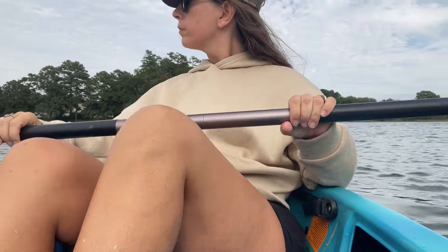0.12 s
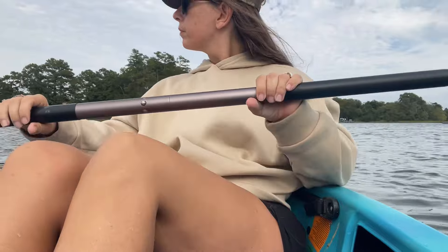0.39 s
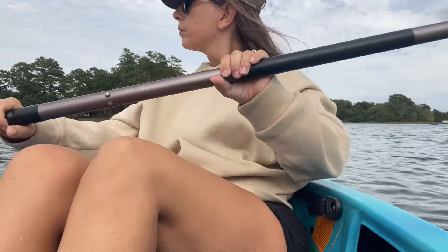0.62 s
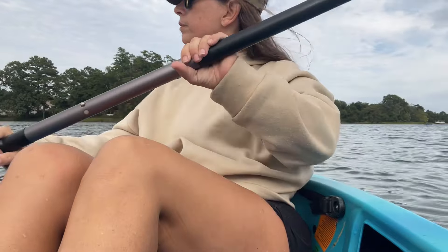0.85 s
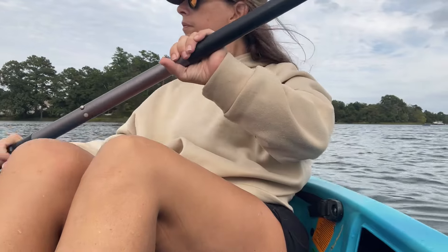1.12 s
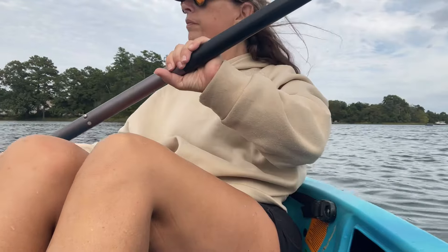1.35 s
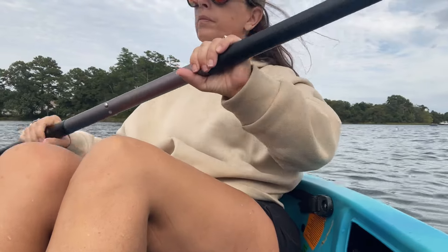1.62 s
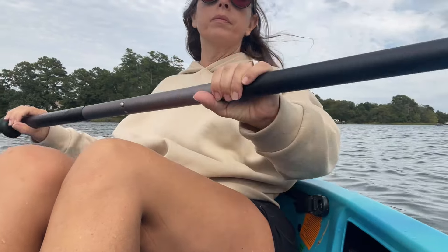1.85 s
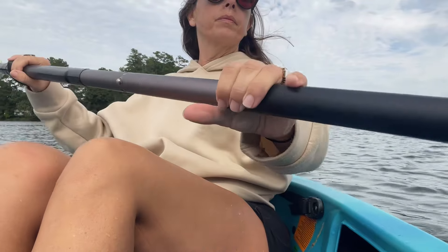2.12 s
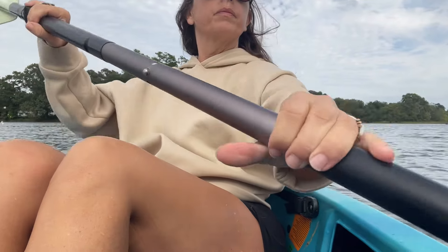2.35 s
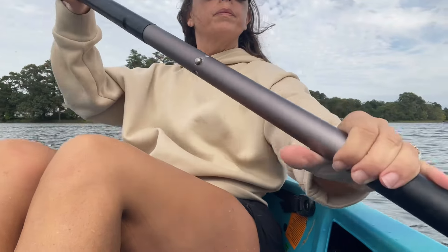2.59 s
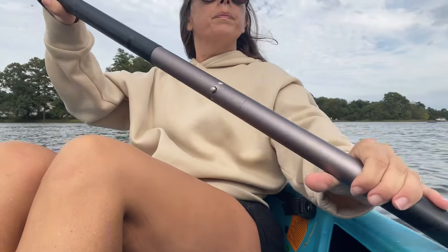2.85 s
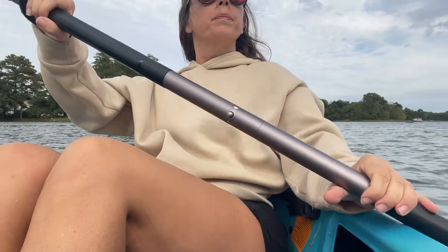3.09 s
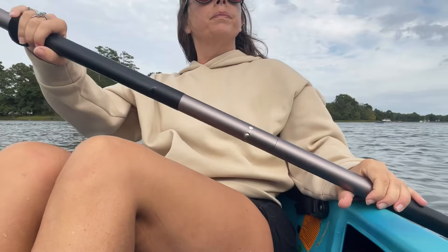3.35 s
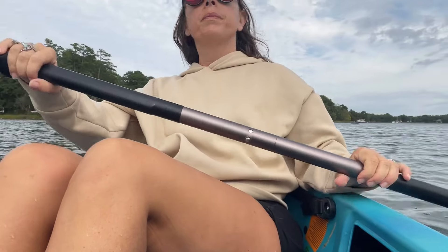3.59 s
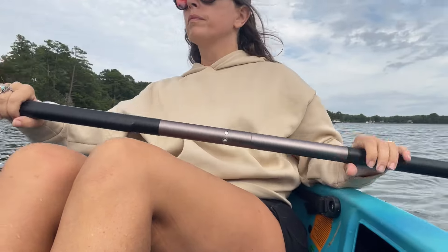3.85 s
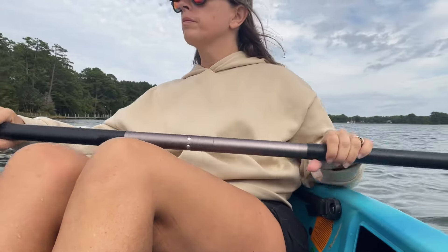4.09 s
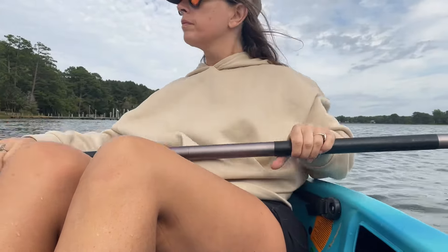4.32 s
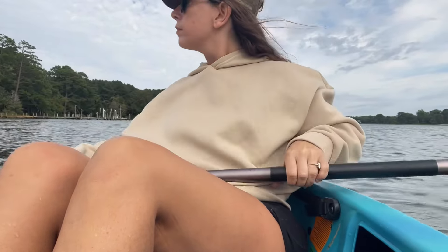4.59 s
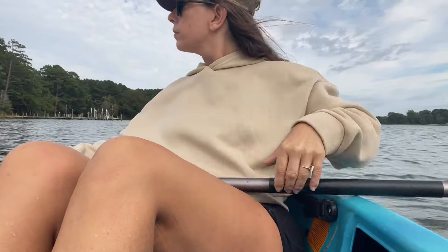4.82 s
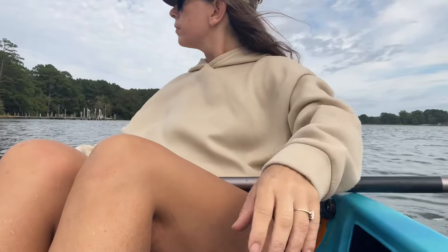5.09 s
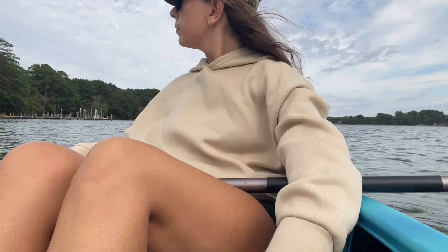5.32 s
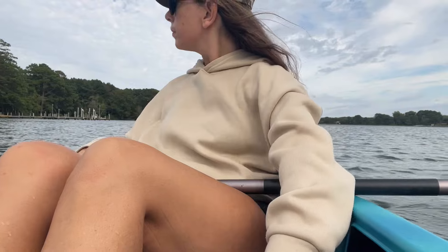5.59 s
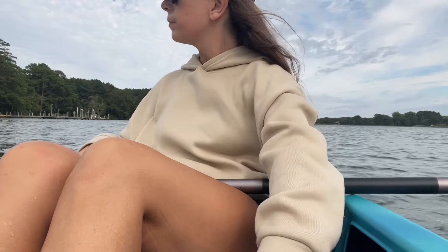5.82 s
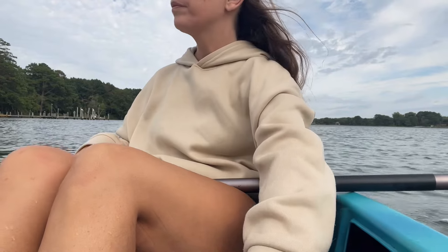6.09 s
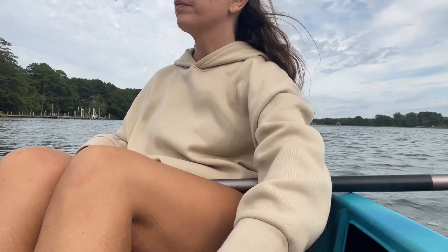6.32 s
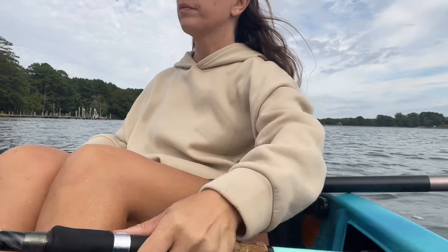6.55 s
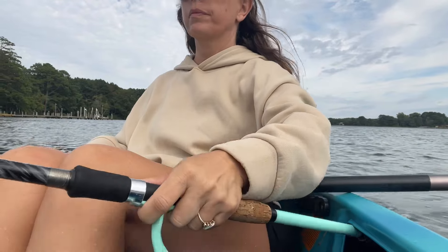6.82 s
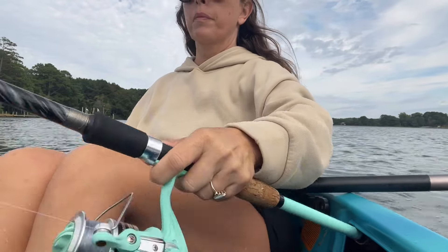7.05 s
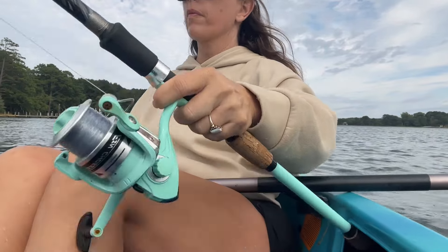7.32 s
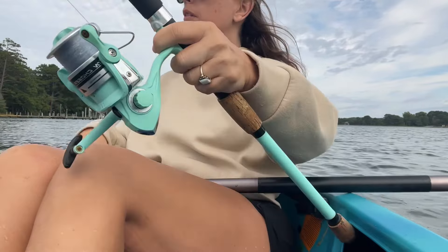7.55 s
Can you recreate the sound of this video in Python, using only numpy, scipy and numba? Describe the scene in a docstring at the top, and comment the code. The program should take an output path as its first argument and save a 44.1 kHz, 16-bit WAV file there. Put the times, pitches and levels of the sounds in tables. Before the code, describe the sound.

Close stereo sound from a phone inside a plastic kayak on open water, over a very soft far hiss. At 0-0.2 s dull bumps and wet, fizzy spray; at 0.5 s a soft low buffet and slap. From 0.7 to 2 s drips, ticks, trickling and small gurgles. At 2.4 s a hollow double knock of the paddle on the hull, then bubbling plops to 3.1 s. From 3 to 5.3 s lively, short, popping slaps come in surges, with knocks at 3.8, 4.4 and 4.8 s. It thins to sparse laps and small cloth or spray rustles around 6.3 s, with a barely audible thin whistle. At 6.65 s the loudest event: a deep hollow thunk with a bright crack, a lighter knock at 6.78 s. Then quiet ripples, a faint scrape and tap at 7.3 s, soft lapping until 7.7 s.

```python
"""Wavelets slap and gurgle on the hull of a plastic kayak: short gliding tones that set the hull modes humming.
Knocks of paddle and rod ring the same modes; ticks are cracks of noise, bubbles brief tones.
Spray and cloth fizz in grainy noise over a far shaped hiss with two whistles; a moving edge thins the bass.
Deep buffets are low noise. A phone in the boat hears it all with two spaced microphones."""
import sys
import numpy as np
from scipy import signal
from scipy.fft import rfft, irfft
from scipy.io import wavfile
from scipy.ndimage import uniform_filter1d
from numba import njit

SR = 44100
rng = np.random.default_rng(int(sys.argv[2]) if len(sys.argv) > 2 else 0)


def waveform_to_disk(signal):
    """Save audio, clipped to [-1, 1], as 16-bit WAV at the path in sys.argv[1]."""
    frames = np.transpose(np.atleast_2d(signal))
    scaled = np.clip(frames, -1, 1) * 32767
    samples = np.round(scaled).astype(np.int16)
    wavfile.write(sys.argv[1], SR, samples)


def undo_db(level):
    """Turn decibels back into plain size, where 20 dB means ten times bigger."""
    steps = np.asarray(level, float) / 20
    return 10 ** steps


N = 338732
T = np.arange(N) / SR


def curves(table):
    """Columns of a table after its time column, one value a sample."""
    s, *columns = np.transpose(table)
    return [np.interp(T, s, column) for column in columns]


def unit(x):
    """Scale to rms 1."""
    return x / np.sqrt(np.mean(x ** 2))


def band(x, lo_hz, hi_hz, order=2):
    """Butterworth band-pass."""
    return signal.sosfilt(signal.butter(order, [lo_hz, hi_hz], "band", fs=SR, output="sos"), x)


def walk(rate_hz):
    """Random levels held 1 / rate_hz and slewed twice."""
    hold = int(SR / rate_hz)
    steps = np.repeat(rng.standard_normal(N // hold + 1), hold)
    return 1.54 * uniform_filter1d(uniform_filter1d(steps, hold), hold)[:N]


def spaced(x, own):
    """One sound at both microphones, 13 samples later at the left, plus a share that each hears alone."""
    return np.array([np.roll(x[0], 13), x[0]]) + own * x[1:]


def swells(start_s, hold_s, level_db):
    """Sum of envelopes that rise, hold and fall; longer ones have softer flanks."""
    t = T[::32]
    start, hold, level = np.array([start_s, hold_s, level_db])[:, :, None]
    rise_s = 0.0091 + 0.21 * hold  # time for 20 dB
    fall_s = 0.031 + 0.067 * hold
    flank = np.minimum(np.minimum((t - start) / rise_s, (start + hold - t) / fall_s), 0)
    return np.interp(T, t, undo_db(level + 20 * flank).sum(axis=0))


@njit
def wavelets(n, sr, s, size, hz, ms, lag_ms, glide, phase):
    """Short tones, Gaussian swell (ms: width at half height) and exponential tail; left lags by lag_ms."""
    out = np.zeros((2, n))
    for e in range(len(s)):
        width = ms[e] / 2355
        for c in range(2):
            mid = s[e] + (.5 - c) * lag_ms[e] / 1000
            first = max(int((mid - 3 * width) * sr), 0)
            last = min(int((mid + 6 * width) * sr), n)
            for i in range(first, last):
                t = i / sr - mid
                u = t / width
                fade = np.exp(-u * u / 2) if u < 1 else np.exp(.5 - u)
                out[c, i] += size[e] * fade * np.cos(2 * np.pi * hz[e] * t * (1 + glide * u) + phase[e])
    return out


def swarm(count, low_hz, high_hz, cycles):
    """Tiny bubbles of all sizes, reaching either microphone first."""
    when, pitch, size, side = rng.random((count, 4)).T.copy()
    hz = low_hz * (high_hz / low_hz) ** pitch
    size = undo_db(-3.5 * np.log(np.maximum(size, .04)))
    return unit(wavelets(N, 1. * SR, when * N / SR, size, hz, 1000 * cycles / hz, side - .3, 0.0062, 0 * hz))


# far hiss colour: pitch_hz, density_db (relative, per Hz)
HISS_COLOUR = [(530, -1.5), (900, 8.5), (985, 6.5), (2350, -31), (3160, -9), (3830, -8.5), (4740, -16),
               (6220, 6), (9140, -11.5), (10200, -7), (13400, -15)]
HISS_DB = -71.5
# thin far tones: start_s, end_s, first_hz, last_hz, level_db
WHISTLES = [(6.345, 6.6, 2480, 2545, -78), (6.595, 6.66, 3020, 3080, -84)]


def far():
    """Smooth hiss of open water and shore, with two faint wavering whistles."""
    hz = np.fft.rfftfreq(N, 1 / SR) + 1
    colour_hz, colour_db = np.transpose(HISS_COLOUR)
    colour = undo_db(np.interp(np.log(hz), np.log(colour_hz), colour_db))
    noise = spaced(rng.standard_normal((3, N)), own=1.0)
    out = unit(irfft(rfft(noise) * colour, N)) * undo_db(HISS_DB + 2.9 * walk(1.79))
    waver_hz, flutter_db = 22 * walk(120), 2.5 * walk(50)
    for start_s, end_s, first_hz, last_hz, level_db in WHISTLES:
        along = np.clip((T - start_s) / (end_s - start_s), 0, 1)
        pitch_hz = first_hz + (last_hz - first_hz) * along + waver_hz
        arch = np.abs(np.sin(np.pi * along)) ** .4
        out = out + undo_db(level_db + flutter_db) * arch * np.sin(2 * np.pi * np.cumsum(pitch_hz) / SR)
    return out


# buffets of deep air: start_s, hold_s, level_db
BUFFETS = [(0.513, 0.022, -49.5), (0.998, 0.019, -80), (2.381, 0.02, -61.5), (2.486, .04, -79),
           (3.112, 0.048, -65.5), (3.25, 0.044, -81), (3.785, 0.066, -83), (4.01, 0.034, -82),
           (4.837, 0.04, -71), (4.97, 0.14, -84), (6.647, 0.019, -59), (6.775, .02, -83)]


def thump():
    """Deep buffets: low noise that reaches both microphones almost alike."""
    still_air_db = -112
    noise = rng.standard_normal(N) + .3 * rng.standard_normal((2, N))
    return unit(band(noise, 44, 193)) * (undo_db(still_air_db) + swells(*np.transpose(BUFFETS)))


# bursts of spray and rubbed cloth: start_s, hold_s, fizz_db, wash_db (relative to fizz_db)
BURSTS = [(0.057, 0.11, -53, -8), (0.193, 0.094, -53.5, -5), (0.713, 0.025, -54, 1),
          (0.884, 0.026, -60.5, -27), (0.987, 0.076, -66.5, -2.5), (1.186, 0.084, -59, -2.5),
          (2.376, 0.051, -62, 14), (2.495, 0.0099, -74, 24), (2.75, 0.2, -70.5, 12.5), (3.06, 0.33, -73, 4),
          (3.79, 0.029, -51, 2), (3.871, 0.028, -59, 8), (4.385, 0.03, -55, 6.5), (4.58, 0.02, -72.5, 14),
          (4.807, 0.019, -67.5, 13), (4.865, 0.026, -81, 16), (5.022, 0.036, -56, 8.5),
          (5.725, 0.018, -70.5, -14), (5.985, 0.066, -73, -18), (6.247, 0.038, -52.5, -6),
          (6.305, 0.024, -50, -17), (6.647, 0.0068, -51.5, 8.5), (6.777, 0.0094, -58.5, 3),
          (7.302, 0.02, -71, -5), (7.416, 0.15, -69, -9)]
# steady dripping and trickling: time_s, level_db
TRICKLE = [(0, -57), (.4, -64), (.66, -75), (.8, -64), (1.35, -64), (2.27, -75), (2.55, -65.5),
           (3.65, -63.5), (4.2, -71.5), (4.9, -74.5), (5.45, -77.5), (6.2, -78.5), (6.9, -77),
           (7.68, -79.5)]


def rustle():
    """Fizz of droplets and cloth: grainy noise with tiny drops, over a coarser bubbling wash."""
    trickle_wash_db = -2
    start_s, hold_s, fizz_db, wash_db = np.transpose(BURSTS)
    steady = undo_db(curves(TRICKLE)[0])
    grain_db = 2.8 * np.minimum(rng.exponential(size=N // 64 + 1), 3.5).repeat(64)[:N]
    grain = spaced(rng.standard_normal((3, N)), own=1.0) * undo_db(grain_db)
    drops = swarm(count=2500, low_hz=3000, high_hz=9100, cycles=6.3)
    fizz = unit(band(grain, 1840, 8920)) + undo_db(-13.5) * drops
    bubbling = swarm(count=5000, low_hz=1183, high_hz=2783, cycles=7.3)
    wash = unit(band(grain, 760, 2580)) + undo_db(-2.0) * bubbling
    fizz_gain = steady + swells(start_s, hold_s, fizz_db)
    wash_gain = steady * undo_db(trickle_wash_db) + swells(start_s, hold_s, fizz_db + wash_db)
    patches_db = 1.86 * walk(45)
    side_db = np.array([[-1.1], [1.1]])
    return undo_db(patches_db + side_db) * (fizz_gain * fizz + wash_gain * wash)


# bubbles freed by the blade: time_s, level_db, pitch_hz
BUBBLES = [(1.259, -48, 2320), (1.345, -52, 1930), (1.938, -52, 2060), (2.316, -46.5, 2750),
           (2.3365, -47, 2630), (2.4645, -47, 1710), (2.605, -32.5, 1246), (2.622, -50, 1500),
           (2.732, -45, 1210), (2.744, -40, 1760), (2.775, -38, 2240), (2.786, -32.5, 2020),
           (2.865, -42, 1970), (2.93, -47, 2540), (2.95, -37, 1710), (2.806, -43, 2500),
           (2.8192, -26.5, 1560), (2.853, -42, 2040), (2.921, -40.5, 2100), (3.078, -34, 1760),
           (3.148, -42, 1780), (3.531, -42, 1180), (3.985, -42, 1280), (4.405, -37, 2140),
           (3.793, -47, 5200), (3.796, -45, 3180), (3.804, -35, 1900), (1.027, -46, 2740),
           (1.207, -45, 3630), (4.069, -50.5, 4380)]


def bubbles():
    """A drop snaps on the surface, then its bubble rings a few cycles, rising a little."""
    s, level_db, hz = np.array(BUBBLES, float).T.copy()
    lag_ms = np.full(len(s), .36)
    snap = wavelets(N, 1. * SR, s + 0.0012, undo_db(level_db - 1.5), 0.83 * hz, 1500 / hz, lag_ms, 0.0, 0 * s)
    ring = wavelets(N, 1. * SR, s + 0.00275, undo_db(level_db), hz, 7000 / hz, lag_ms, 0.012, 0 * s)
    return snap + ring


# sharp ticks of spray and of hard contact: time_s, level_db (mean of the sides +0.5), centre_hz
TICKS = [(0.071, -31.5, 1600), (0.187, -35.5, 2900), (0.187, -29, 1500), (0.7104, -35, 2400),
         (0.8585, -48, 3700), (0.8814, -42.5, 6000), (0.915, -36, 6360), (0.9828, -38, 7640),
         (1.015, -48, 2700), (1.116, -41.5, 4650), (1.162, -45, 3650), (1.1879, -39, 6670),
         (1.2872, -48, 3100), (1.338, -52, 2100), (1.374, -45.5, 2000), (1.394, -51, 2200),
         (1.262, -44, 1900), (1.658, -49, 4470), (2.0028, -51.5, 4020), (2.367, -24.5, 1820),
         (2.4042, -28.5, 2670), (2.405, -31, 5360), (2.7445, -44.5, 2370), (3.263, -45, 8050),
         (3.7763, -45, 3340), (3.928, -49, 6470), (4.152, -49, 4320), (4.253, -53, 2300),
         (4.642, -52, 6700), (4.8007, -37, 3000), (4.8027, -38.5, 8750), (4.873, -42.5, 3540),
         (4.873, -51, 8950), (4.998, -44.5, 2030), (5.027, -39, 2420), (5.048, -42, 3000),
         (5.7288, -51.5, 5960), (5.9952, -46.5, 6000), (6.232, -46, 5700), (6.638, -39, 1500),
         (6.648, -30, 2400), (6.6488, -27, 7500), (6.776, -35, 6440)]


def ticks():
    """Short noisy cracks, broad around their centre, louder at the right microphone."""
    out, t = np.zeros((2, N + SR)), np.arange(SR // 10) / SR
    envelope = (1 - np.exp(-t / 0.0012)) * 1000 ** (-t / 0.024)
    side_db = np.array([[-2.5], [1.5]])
    for s, level_db, hz in TICKS:
        noise = spaced(rng.standard_normal((3, len(t))), own=1.0)
        crack = unit(band(noise, hz / 1.55, min(hz * 1.46, 12500))) * envelope
        i = int(s * SR)
        out[:, i:i + len(t)] += undo_db(level_db + side_db) * crack
    return out[:, :N]


# hull modes: pitch_hz, level_db, t60_s (undamped)
HULL_MODES = [(262.3, -3.5, 0.19), (335, -16.5, 0.28), (388.1, -1, 0.18), (457, -4, 0.074), (570, -9, 0.4),
              (690, 4, 0.28), (770, -3.5, 0.24), (906, -2, 0.26), (1000, -1.5, 0.11), (1088, -3, 0.16),
              (1235, 0.5, 0.16), (1425, -3.5, 0.23), (1940, -5, 0.025)]


def hum(x, sharpness):
    """The hull modes as resonators, shaken by x."""
    return sum(undo_db(level_db) * signal.lfilter(*signal.iirpeak(hz, hz * t60_s * sharpness, fs=SR), x)
               for hz, level_db, t60_s in HULL_MODES)


# blows on the hull: time_s, level_db, ring_centre_hz, contact_ms, damping (divides t60)
KNOCKS = [(0.046, -26, 260, 13, 3.3), (.072, -20, 660, 8.9, 5), (.074, -34, 844, 5, 2.3),
          (.074, -34, 442, 8.9, 2), (0.188, -41.5, 940, 2.3, 1.8), (0.713, -35, 654, 11.5, 3.9),
          (2.368, -24, 710, 1.8, 3.1), (2.372, -34.5, 1160, 6.6, 5.3), (2.384, -26.5, 710, 6, 2.5),
          (2.370, -18, 368, 5.6, 2.9), (2.38, -21.5, 372, 7.9, 1.8), (2.402, -24, 390, 5.8, 4.9),
          (2.494, -32.5, 790, 2.1, 1.7), (2.518, -30.5, 343, 3.5, 2.8), (2.523, -35, 885, 2.3, 4.6),
          (3.797, -26, 694, 3.8, 3.3), (3.81, -16, 392, 2, 7.2), (3.83, -30.5, 497, 4.6, 3.1),
          (3.901, -29, 690, 3.2, 4), (4.384, -35.5, 764, 10, 1.5), (4.402, -24.5, 635, 3, 5.2),
          (4.8, -38, 1270, 1.4, 3.4), (4.804, -29.5, 750, 6.4, 2.4), (4.822, -34.5, 650, 6.1, 3.6),
          (6.639, -28.5, 450, 3, 1.7), (6.649, -30.5, 950, 2.5, 3.2), (6.651, -18, 670, 1.7, 4.5),
          (6.657, -6.5, 311, 4.7, 4.2), (6.666, -7.5, 317, 4.7, 3.2), (6.667, -22.5, 664, 2.3, 2.4),
          (6.682, -25, 397, 3.3, 1.45), (6.777, -40.5, 1010, 1.6, 2.8), (6.785, -31, 690, 4.9, 2.8),
          (6.789, -31, 400, 10.3, 1.7), (7.305, -40, 382, 7.5, 1.2)]


def knocks():
    """Each blow rings the hull modes near its centre, builds up during contact, wavers as the shell flexes."""
    lag_at_500_hz_ms, lag_ms_per_octave = 0.51, 0.33  # a deep ring shakes the whole shell: less lag
    left_db_per_octave = 5  # left over right, above 400 Hz
    skirt_db = -29  # every blow also stirs modes far from its centre
    out, count = np.zeros((2, N)), SR // 4
    hz, mode_db, t60_s = np.transpose(HULL_MODES)[:, :, None]
    for s, level_db, centre_hz, contact_ms, damping in KNOCKS:
        lag_ms = lag_at_500_hz_ms + lag_ms_per_octave * np.log2(centre_hz / 500)
        near = undo_db(mode_db - 59.0 * np.log2(hz / centre_hz) ** 2)
        gain = near + undo_db(mode_db + skirt_db) * centre_hz / hz
        detune = 1 + 0.012 * rng.standard_normal(hz.shape)
        flex = uniform_filter1d(rng.standard_normal((len(hz), count)), size=300)
        waver = 19 * uniform_filter1d(flex, size=150)
        for c in range(2):
            t = np.maximum(np.arange(count) / SR - (1 - c) * lag_ms / 1000, 0)
            rise = np.sin(np.pi / 2 * np.minimum(1000 * t / contact_ms, 1)) ** 2
            # each microphone sits over another part of the shell
            tilt_db = (.5 - c) * left_db_per_octave * np.log2(hz / 400)
            side = undo_db(2.8 * rng.standard_normal(hz.shape) + tilt_db)
            decay = 1000 ** (-np.maximum(t - contact_ms / 1000, 0) * damping / t60_s)
            tones = np.sin(2 * np.pi * hz * detune * t + 0.35 * waver)
            ring = np.sum(side * gain * tones * decay, axis=0)
            i = int(s * SR)
            out[c, i:i + count] += undo_db(level_db) * rise * ring
    return out


def gurgle(count, low_hz, high_hz, cycles, spread_db):
    """A crowd of small slaps of all sizes, right microphone first; each has a dull body and a bright edge."""
    when, pitch, size, side, phase = rng.random((count, 5)).T.copy()
    s = when * N / SR
    hz = low_hz * (high_hz / low_hz) ** pitch
    lag_ms = 0.56 + 1.08 * (side - .5)
    size = undo_db(-spread_db * np.log(np.maximum(size, .03)))
    body = wavelets(N, 1. * SR, s, size, hz, 1000 * cycles / hz, lag_ms, -0.031, 2 * np.pi * phase)
    edge = wavelets(N, 1. * SR, s, np.sqrt(size), 2.355 * hz, 1100 / hz, lag_ms, -0.012, 4 * np.pi * phase)
    return unit(body), unit(edge)


# slaps of water that stand out: time_s, level_db, pitch_hz, length_ms, left_lag_ms
SLAPS = [(0.5248, -31, 315, 6.4, 0.74), (0.541, -21, 357, 1.06, 0.53), (0.712, -28.5, 2300, 1.08, 0.34),
         (0.815, -33.5, 427, 2.3, 0.68), (1.026, -28.5, 430, 4.3, 0.71), (1.0635, -29.5, 593, 0.82, 0.4),
         (1.0885, -37, 630, 4.8, 0.53), (1.173, -24.5, 585, 1.2, 0.64), (1.25, -27.5, 1200, 4.1, 0.38),
         (1.139, -47, 950, 4.2, 0.37), (1.237, -36.5, 570, 2, 0.63), (1.293, -37.5, 1000, 9.5, 0.33),
         (1.3, -33.5, 493, 5.3, 0.65), (1.362, -42, 733, 17, 0.46), (1.457, -35, 734, 8.7, 0.37),
         (1.473, -38.5, 420, 6.3, 0.61), (1.3829, -25, 520, 1.3, 0.61), (1.4017, -28, 506, 1.8, 0.6),
         (1.4596, -28, 570, 3.8, 0.86), (1.606, -28, 480, 2.3, 0.75), (1.7186, -38.5, 590, 8.5, 0.68),
         (1.7318, -37.5, 564, 1.7, 0.22), (1.8623, -34.5, 610, 1.3, 0.39), (1.9041, -36, 650, 1.25, 0.29),
         (1.9393, -38.5, 584, 3.9, 0.5), (2.065, -41.5, 805, 11, 0.35), (2.867, -28, 500, 3.3, 0.88),
         (2.9234, -29, 870, 0.93, -0.35), (3.0459, -18, 780, 1.07, -0.71), (3.1874, -17.5, 550, 0.87, 0.64),
         (3.2179, -25, 620, 0.83, 0.7), (3.272, -27, 864, 1.8, -0.67), (3.3199, -26.5, 706, 0.97, 0.66),
         (3.298, -36, 480, 6.3, 0.62), (3.328, -40, 1890, 1.45, 0.096), (3.378, -41, 700, 0.75, 0.34),
         (3.531, -34, 555, 5.5, 0.58), (3.574, -35, 570, 3, 0.68), (3.603, -38, 474, 5.4, 0.47),
         (3.739, -41, 1150, 2.1, 0.15), (3.4085, -24, 644, 2.6, 0.71), (3.4224, -25, 930, 2, -0.72),
         (3.4408, -26.5, 710, 2.7, 0.67), (3.4971, -23.5, 910, 0.8, -0.7), (3.6221, -28.5, 600, 2.1, 0.66),
         (3.687, -28, 660, 2.1, 0.69), (3.717, -27.5, 846, 1.3, -0.67), (3.852, -29, 1000, 2.6, 0.2),
         (4.0156, -22, 766, 0.71, 0.16), (4.044, -18.5, 895, 1.8, -0.65), (4.0746, -27.5, 825, 0.95, 0.19),
         (4.1109, -22.5, 754, 0.62, 0.62), (4.1538, -29.5, 770, 1.16, 0.61), (4.1909, -33, 785, 1.7, -0.66),
         (4.129, -42, 1100, 0.92, 0.25), (4.218, -39, 644, 1.6, 0.51), (4.307, -36, 690, 1.8, 0.56),
         (4.47, -38, 1040, 1.8, 0.24), (4.528, -38, 950, 1.4, 0.045), (4.692, -37, 1180, 1.1, 0.13),
         (4.2685, -19, 890, 0.84, -0.64), (4.35, -25, 990, 0.85, 0.16), (4.4317, -27.5, 850, 2, -0.77),
         (4.487, -24.5, 770, 0.63, 0.31), (4.5066, -27.5, 640, 1.4, 0.6), (4.5475, -19.5, 890, 1.7, -0.66),
         (4.5753, -23.5, 1080, 1.35, -0.76), (4.6203, -25.5, 1160, 0.9, -0.74),
         (4.6448, -30, 840, 1.8, -0.81), (4.6782, -30, 815, 1.1, 0.66), (4.744, -25.5, 1050, 0.78, -0.74),
         (4.7787, -31, 870, 2.2, -0.84), (4.828, -25, 776, 1.5, 0.28), (4.8433, -29.5, 1100, 1.3, 0.16),
         (4.8636, -29, 810, 0.99, -1.08), (4.975, -23.5, 786, 0.75, -0.82), (5.0132, -29.5, 825, 3.3, 0.34),
         (5.0795, -24, 930, 0.81, 0.11), (5.1134, -18.5, 1390, 0.71, 0.15),
         (5.145, -30.5, 950, 0.83, 0.075), (5.266, -31.5, 785, 2.2, 0.46), (5.2798, -32, 950, 1, 0.019),
         (5.307, -35, 810, 2.1, 0.32), (5.509, -41, 1000, 2.4, 0.15), (5.5636, -41.5, 640, 5.9, 0.53),
         (5.596, -36, 865, 0.94, 0.17), (5.639, -34, 800, 1.5, 0.29), (5.6745, -38.5, 730, 2.5, 0.42),
         (5.734, -42.5, 825, 1.9, 0.24), (5.776, -29, 1070, 1.2, 0.15), (6.086, -43, 580, 2.6, 0.56),
         (6.118, -36.5, 704, 1.9, 0.47), (6.273, -28.5, 604, 2.1, 0.73), (6.5364, -30.5, 646, 0.89, 0.33),
         (6.562, -39.5, 700, 1.1, 0.78), (7.04, -35.5, 584, 1.8, 0.65), (7.216, -42, 520, 5, 0.64),
         (7.2261, -41.5, 553, 2.3, 0.62), (7.5713, -36.5, 636, 3.2, 0.63), (7.67, -36.5, 734, 1.5, 0.63)]


def slaps():
    """Each slap squeezes a pocket of air: short ones fall in pitch, long ones nearly hold it."""
    rows = np.array(SLAPS, float)
    phase = .5 * rng.standard_normal(len(rows))
    is_long = rows[:, 2] * rows[:, 3] > 2500  # 2.5 cycles
    out = np.zeros((2, N))
    for pick, glide in ((is_long, -0.015), (~is_long, -0.078)):
        s, level_db, hz, length_ms, lag_ms = rows[pick].T.copy()
        out += wavelets(N, 1. * SR, s, undo_db(level_db), hz, length_ms, lag_ms, glide, phase[pick].copy())
    return out


# how hard water works along the hull: time_s, gurgle_db (before trim), edge_db (relative to body)
LAPPING = [(0, -55.5, -5), (.4, -54.5, -8), (.63, -64.5, -8), (.75, -55, -48), (1.33, -55, 6),
           (1.7, -52.5, -12.5), (1.81, -66.5, -2), (1.9, -52.5, -11.5), (2.3, -52.5, -6.5),
           (2.48, -46.5, -3), (2.79, -48, -4), (3.26, -41, -5.5), (3.66, -54, -1.5), (3.84, -37.5, -5.5),
           (4.3, -60, -2), (4.42, -41.5, -2.5), (4.73, -61, 8.5), (5.0, -38.5, -4.5), (5.2, -63, 12.5),
           (5.75, -63.5, 3.5), (5.87, -65, 0.5), (6.1, -54.5, 1.5), (6.17, -61, -10.5), (6.3, -55.5, -2.5),
           (6.7, -53.5, -11), (6.97, -66.5, -22.5), (7.49, -49.5, -5), (7.68, -63, -9)]
# hand, rod and paddle drag along the shell: start_s, hold_s, level_db (into the hull modes)
SCRAPES = [(0.719, 0.034, -47.5), (1.203, .25, -54.5), (2.493, 0.072, -47), (2.85, 0.15, -49),
           (3.78, .14, -53), (4.4, .04, -51), (4.796, 0.091, -45), (7.304, .25, -53.5)]


def lapping():
    """Gurgle in surges, scattered small slaps and single big ones; the hull hums to these and to scrapes."""
    gurgle_db, edge_db = curves(LAPPING)
    body, edge = gurgle(count=2500, low_hz=186.6, high_hz=642, cycles=2.06, spread_db=2.5)
    patter, _ = gurgle(count=170, low_hz=520, high_hz=950, cycles=2.6, spread_db=-3.0)
    trim_db = -1.5
    surge = undo_db(gurgle_db + trim_db + 0.3 * walk(50) + 2.36 * walk(8.5))
    crowd = surge * (body + undo_db(edge_db) * edge + undo_db(-15.0) * patter)
    rub = unit(band(spaced(rng.standard_normal((3, N)), own=0.47), 300, 750, order=1))
    drag = rub * undo_db(3.5 * walk(70)) * swells(*np.transpose(SCRAPES))
    big = slaps()
    return crowd + big + hum(undo_db(-6.5) * big + undo_db(-6.0) * crowd + drag, sharpness=0.25)


# edge under which the bass is taken away: time_s, edge_hz
BASS_EDGE = [(0, 119), (.52, 104), (.6, 308), (1.0, 217), (1.1, 347), (1.7, 249), (2.25, 329), (2.36, 197),
             (2.8, 169), (3.0, 283), (3.45, 383), (3.7, 329), (4.75, 392), (5.6, 335), (5.8, 443),
             (6.0, 347), (6.57, 276), (6.62, 200), (6.75, 198), (6.9, 277), (7.68, 344)]


def low_cut(x, slope_db_per_octave):
    """Steep high-pass on short-time spectra; its edge follows the table."""
    hz, s, spectra = signal.stft(x, SR, nperseg=2048)
    edge_hz = np.interp(s, *np.transpose(BASS_EDGE))
    octaves_below = np.maximum(np.log2(edge_hz / (hz[:, None] + 1)), 0)
    return signal.istft(spectra * undo_db(-slope_db_per_octave * octaves_below), SR, nperseg=2048)[1][:, :N]


def scene():
    """Everything in and around the boat, in the open air; buffets bypass the low cut."""
    thinned = low_cut(far() + rustle() + bubbles() + ticks() + knocks() + lapping(), slope_db_per_octave=95.0)
    return thinned + thump()


def roll_off(x):
    """The treble ends steeply here."""
    return signal.sosfilt(signal.butter(12, 13580, fs=SR, output="sos"), x)


def record(dry):
    """A dip near 9 kHz and a roll-off at the top."""
    dipped = dry - 0.71 * signal.lfilter(*signal.iirpeak(8900, 6.0, fs=SR), dry)
    mix = signal.sosfilt(signal.butter(4, 12600, fs=SR, output="sos"), dipped)
    return roll_off(mix)


dry = scene()
out = record(dry)
waveform_to_disk(out)
```